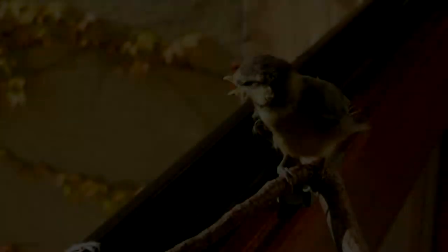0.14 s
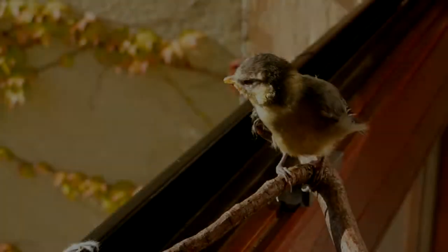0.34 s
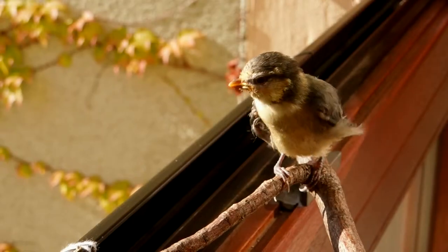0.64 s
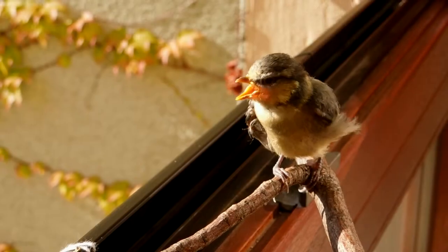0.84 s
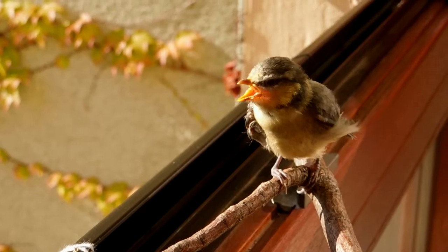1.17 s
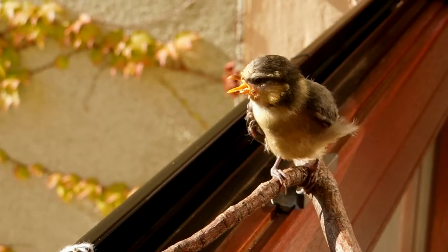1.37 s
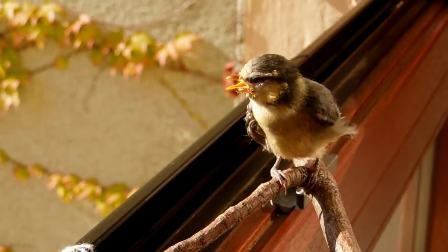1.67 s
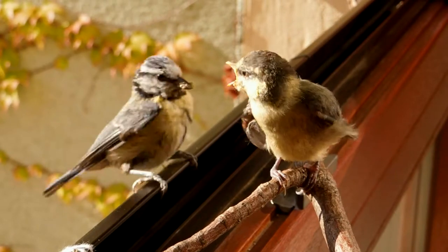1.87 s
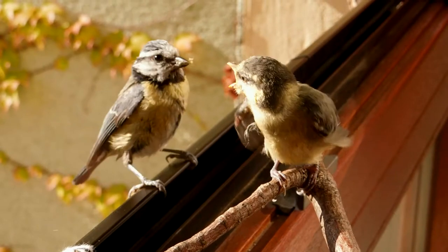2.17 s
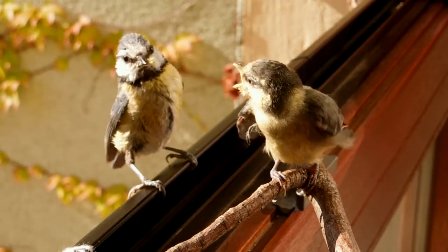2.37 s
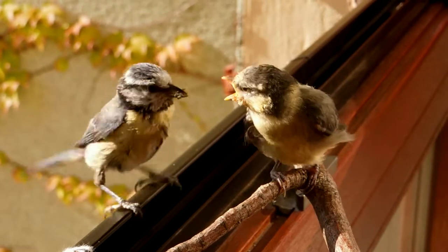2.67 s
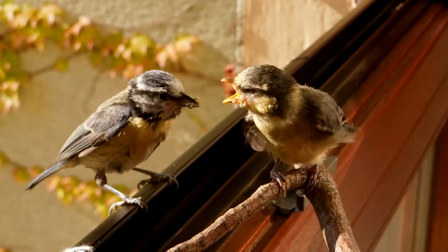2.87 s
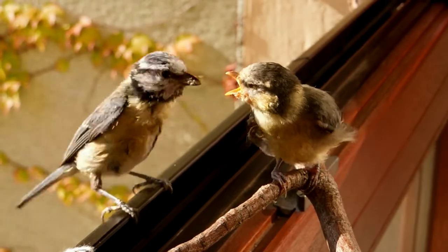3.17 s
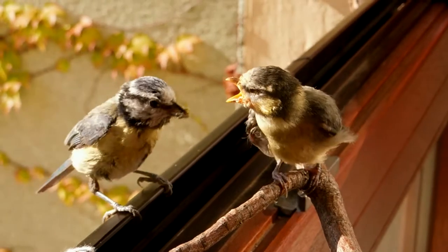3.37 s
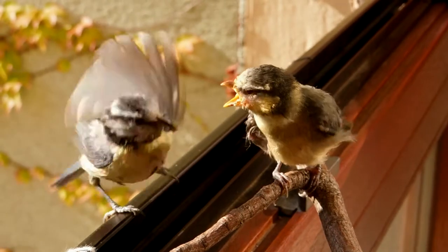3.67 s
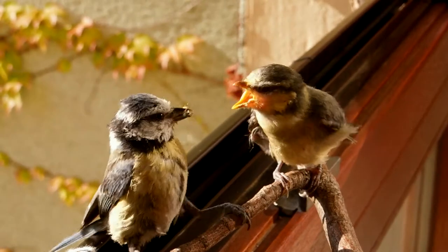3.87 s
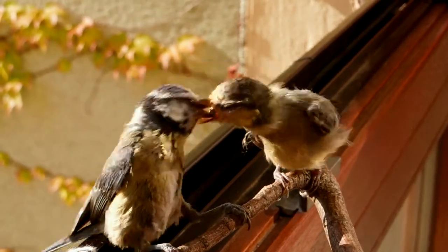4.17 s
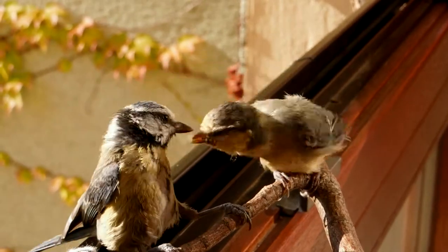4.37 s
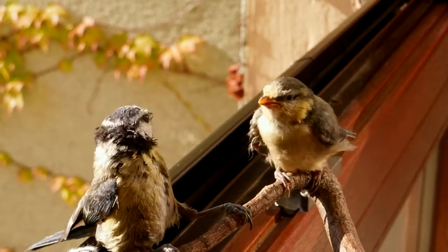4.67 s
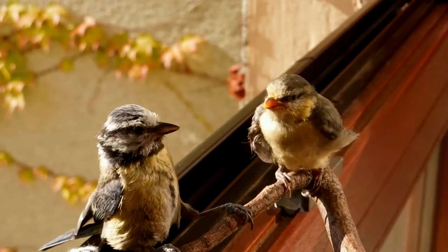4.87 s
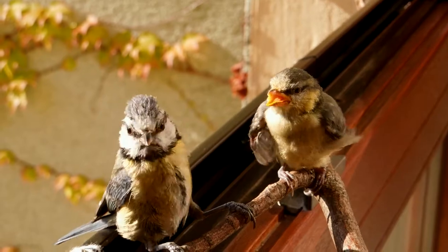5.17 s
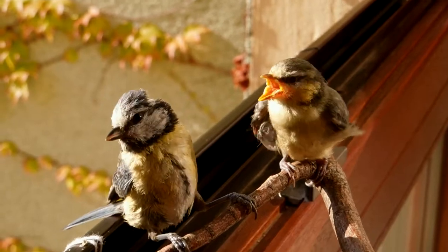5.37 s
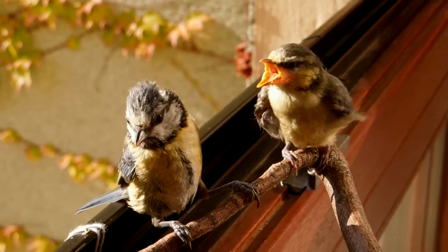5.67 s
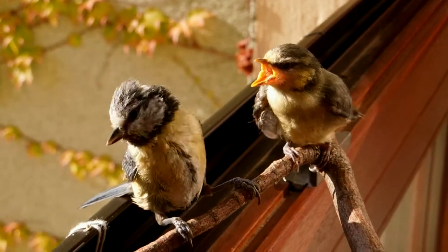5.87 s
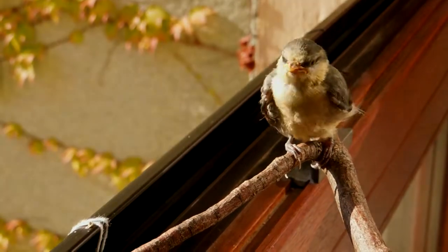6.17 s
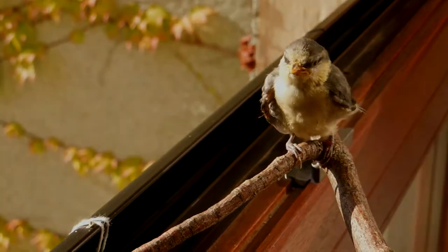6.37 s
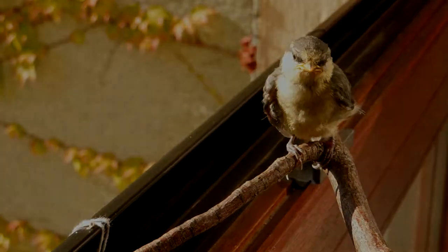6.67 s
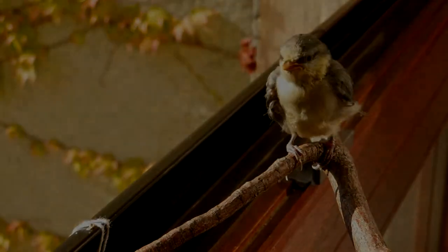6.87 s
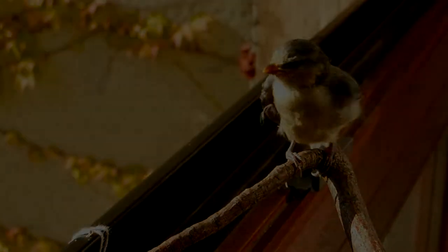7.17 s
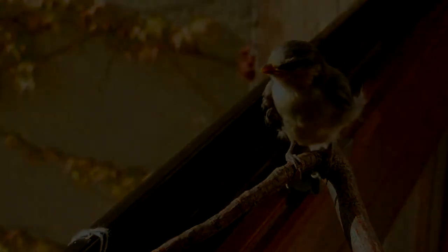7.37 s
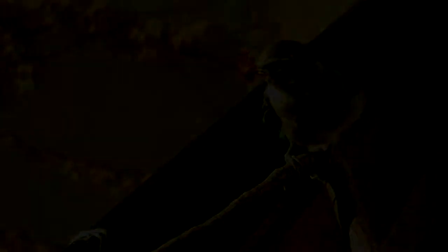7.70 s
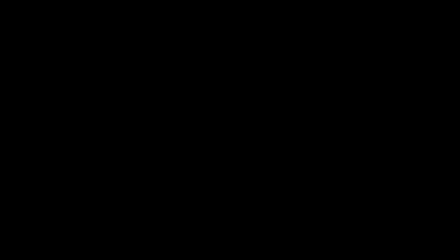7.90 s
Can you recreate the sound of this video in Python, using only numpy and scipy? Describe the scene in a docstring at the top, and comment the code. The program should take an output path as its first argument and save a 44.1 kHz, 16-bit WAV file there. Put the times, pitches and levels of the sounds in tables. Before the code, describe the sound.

Over a low, soft outdoor hush, a fledgling's very high begging calls burst out in short clusters, each scratchy at first and then piercing. Feathery wing flurries and small woody claw clicks mark the parent arriving and hopping. After feeding come tiny descending whistles, beak ticks and two crisp wing strokes, then a dwindling string of peeps and a sharp late tick. Close stereo microphones, short reflections from the wall, background fading in and out.

```python
"""A fledgling tit begs on a perch beside a house wall, a little louder in the right microphone.
Each call is a rasp of noise and ragged buzz; some lock into a squeal of two mixing tones, led in by a squeak.
Thin falling peeps are whistles with an octave. The parent flutters in, feeds it and leaves: pulsed and swept
noise for wings, a low throb for pushed air, short noise bursts for claws, beak and twig.
Behind them lie outdoor hush, rumble, a faint hum and a distant engine, fading in and out, and a late sizzle."""
import sys
import numpy as np
from scipy import signal
from scipy.fft import rfft, irfft, next_fast_len
from scipy.io import wavfile
from scipy.ndimage import map_coordinates

SR = 44100
rng = np.random.default_rng(int(sys.argv[2]) if len(sys.argv) > 2 else 0)


def inscribe(sig):
    """Save sig as 16-bit PCM at rate SR to the path in sys.argv[1].

    A 1-D sig is mono; a 2-D sig holds one channel per row.
    Samples are clipped to [-1, 1] before scaling.
    """
    pcm = np.round(np.clip(np.atleast_2d(sig).T, -1, 1) * 32767)
    wavfile.write(sys.argv[1], SR, pcm.astype(np.int16))


N = 354563

# Event levels are nominal: swells, fades, wall reflections and microphone balance act on them later.
# Spectra are relative: each noise is scaled to rms 1.

# Distant hush and rumble over time: start_s, rumble_db, hush_db
HUSH_LEVELS = [(1.0, -51.5, -47), (1.6, -54.5, -50), (2.1, -49, -45), (2.7, -52, -47), (4.3, -50.5, -43.5),
               (4.8, -53.5, -46), (6.3, -51.5, -46)]
# Spectrum of the hush: frequency_hz, density_db (per Hz)
AIR_SPECTRUM = [(60, -11.5), (105, -1.5), (150, -3.5), (195, -0.5), (240, -3), (310, -4.5), (440, -9.5),
                (620, -4.5), (1060, -5), (1600, -8), (2700, -16), (4200, -20.5), (9000, -26),
                (14000, -27.5)]
# Spectrum of the rumble: frequency_hz, density_db (per Hz)
RUMBLE_SPECTRUM = [(15, -8), (25, -4.5), (36, 8), (48, -4), (75, -1.5), (100, -16), (160, -46)]
# Distant engine, slowing under load, then picking up: time_s, pitch_hz, level_db
ENGINE_COURSE = [(1.5, 81.5, -59.5), (3.2, 74.37, -53.5), (4.2, 68, -50.5), (4.9, 65.5, -47.5),
                 (5.63, 60.12, -42.5), (5.82, 76.43, -61)]
# Faint far-off sizzle: time_s, level_db
SIZZLE_LEVELS = [(7.1, -86.5), (7.32, -60), (7.86, -67)]
# Spectrum of the sizzle: frequency_hz, level_db
SIZZLE_SPECTRUM = [(3600, -26.5), (4400, -3), (5500, -4.5), (6000, -29)]
# Overtones of the hum: multiple, level_db
HUM_OVERTONES = [(2, -1), (3, -2.5), (4, -4)]
# The hum briefly turns buzzy: start_s, end_s, overtones_db
HUM_BUZZY = (7.35, 7.5, -62)
# Dry ticks of beak and twig: start_s, level_db
TICKS = [(.3805, -35), (.385, -33.5), (5.1315, -27), (5.3377, -24), (6.0953, -28.5), (7.6133, -31),
         (7.6483, -12.5)]
# Spectrum of a tick: frequency_hz, level_db
TICK_SPECTRUM = [(300, -27.5), (850, 0.5), (1900, -8.5), (3100, -1), (5500, -2), (7500, -5), (10500, -2),
                 (13500, -6.5), (15000, -13)]
# Falling contact peeps: start_s, end_s, start_hz (before the opening hook), level_db
PEEPS = [(0.602, 0.654, 6740, -41.5), (5.131, 5.174, 6320, -26), (5.235, 5.297, 5990, -25.5),
         (5.802, 5.853, 6355, -25.5), (6.329, 6.375, 6120, -39.5), (6.428, 6.48, 6050, -38),
         (6.508, 6.558, 6350, -38.5), (6.594, 6.645, 6100, -41), (6.682, 6.744, 5740, -43.5),
         (6.793, 6.861, 5650, -45.5), (6.934, 6.998, 5490, -50), (7.069, 7.14, 5520, -51),
         (7.437, 7.516, 5750, -60)]
# Short squeaks as the beak opens: start_s, level_db
SQUEAKS = [(0.985, -34.5), (1.095, -32.5), (1.238, -28.5), (2.151, -33.5), (3.578, -36), (3.61, -39),
           (4.29, -26.5)]
# Begging calls that stay a rasp: start_s, end_s, level_db, treble_db, buzz_db
RASPS = [(1.411, 1.485, -40, -5, 4), (2.167, 2.241, -38, 0.5, -4.5), (2.697, 2.793, -29, -19.5, -5.5),
         (4.045, 4.096, -31, -2.5, -12)]
# Begging calls that lock from a rasp into a squeal: start_s, crest_s, end_s, rasp_db, squeal_db,
# crest_hz (upper voice), start_share (of crest_hz), lower_voice_db
SQUEALS = [(0.991, 1.032, 1.046, -38.5, -24.5, 8780, .83, 0.5),
           (1.1, 1.122, 1.177, -36, -17.5, 8770, 0.83, -1),
           (1.239, 1.263, 1.337, -40.5, -14.5, 8256, 0.99, -7.5),
           (2.312, 2.377, 2.386, -27, -13.5, 7800, .62, -11.5),
           (2.429, 2.464, 2.506, -32.5, -11.5, 8194, 0.75, -6),
           (2.555, 2.583, 2.638, -29.5, -11, 7850, .68, -13),
           (4.173, 4.23, 4.248, -27.5, -14, 8095, .62, -8.5),
           (4.294, 4.324, 4.356, -29.5, -11.5, 7830, 0.72, -7)]
# Spectrum of the rasp's hiss: frequency_hz, level_db
RASP_SPECTRUM = [(1500, -33), (2400, -21), (3100, -6.5), (3800, -10.5), (4800, 0.5), (6200, -7),
                 (7400, 5.5), (8300, -1.5), (9500, -13), (13500, -12), (15000, -17.5)]
# Spectrum of the rasp's added treble: frequency_hz, level_db
TREBLE_SPECTRUM = [(3000, -41), (7500, -32), (9500, -1), (13500, -5.5), (15000, -29.5)]
# Partials of the rasp's ragged buzz: multiple, level_db
BUZZ_PARTIALS = [(2, -9.5), (3, -7.5), (4, -7.5), (5, 1)]
# Tones made as the two voices mix in the syrinx: upper_multiple, lower_multiple, level_db
VOICE_BLENDS = [(-.5, 1, -36.5), (2, -1, -31.5), (-1, 2, -23), (1.5, 0, -32), (0, 2, -27), (1, 1, -15),
                (2, 0, -40.5), (-2, 3, -26.5), (-3, 4, -25.5), (3, -2, -28.5), (4, -3, -30)]
# Wing flurries: middle_s, level_db
WING_FLURRIES = [(1.39, -50), (1.881, -53.5), (1.969, -50), (2.09, -56.5), (2.99, -46), (3.24, -41),
                 (3.37, -53), (3.5, -43.5), (3.98, -50), (6.209, -44), (6.36, -49.5)]
# Spectrum of feathers brushing the air: frequency_hz, level_db
FEATHER_SPECTRUM = [(500, -18.5), (2200, 4), (4000, -3.5), (8000, -2.5), (12500, 6), (15000, -0.5)]
# Claws landing on the wooden frame: start_s, level_db
CLAWS = [(2.0467, -22.5), (2.9253, -32), (3.0165, -26.5), (3.0443, -31.5), (3.2536, -32.5), (3.5064, -33.5)]
# Spectrum of the wooden frame: frequency_hz, level_db
FRAME_SPECTRUM = [(300, -9.5), (900, -10), (1950, -3), (2280, 17.5), (2700, -4), (7000, -10), (13000, 0),
                  (15000, -9.5)]
# Air pushed at the microphones by the parent's wings: middle_s, half_width_s, level_db
DRAUGHTS = [(2.87, 0.14, -43.5), (6.275, .09, -42.5)]
# Hard wing strokes as the parent flies off: start_s, end_s, level_db
WING_STROKES = [(6.108, 6.152, -34), (6.243, 6.292, -24.5)]
# Spectrum of a wing stroke: frequency_hz, level_db
STROKE_SPECTRUM = [(710, -57.5), (1200, -28), (1410, -16), (1810, -21.5), (3910, -11.5), (4910, -6.5),
                   (8290, -13.5), (9570, 2), (14000, -11)]
# Opening and closing of the whole sound: time_s, gain
OPENING = [(.13, 0), (.15, 1), (7.862, 1), (7.872, 0)]

TOP_HZ = 14350  # nothing sounds from here up
FADE_IN_S, FADE_OUT_S, SILENT_AT_S = 2.13, 1.96, 8.14  # straight fades of the background
HUM_HZ, HUM_DB, HUM_OVERTONES_DB = 196, -60.5, -19
SECOND_HUM_HZ, SECOND_HUM_DB = 156.6, -63  # a lower tone beside it
PEEP_END_HZ, PEEP_BEND = 4694, 1.55  # every peep slides towards this pitch, ever more steeply
OCTAVE_DB = 1.5  # octave as a peep begins
SQUEAK_HZ = 7500  # strongest part of a squeak
RASP_SWELL_DB = 4.5  # tilt from start to end
LEAD_SWELL_DB, LEAD_TREBLE_DB, LEAD_BUZZ_DB = 7.5, -1, -15.5  # the rasp that leads into a squeal
VOICED_SHARE = .65  # last part of that rasp in which the voices already sound
LOWER_VOICE = .856  # pitch of the lower voice over the upper, before the sag
SAG_HZ, SAG_S, SAG_BEND = 672, .05, .8  # nominal fall this long after the crest, fastest at first
# a weak third voice: share of the upper pitch, how much faster it sags, level
UNDERTONE, UNDERTONE_SAG, UNDERTONE_DB = .52, 1.8, -28
FLURRY_S = 0.072  # width of a wing flurry between its 1/e points


def amp(db):
    """Decibels to gain."""
    return 10 ** (np.asarray(db) / 20)


def unit(x):
    """Scale to rms 1."""
    return x / np.sqrt(np.mean(x ** 2) + 1e-20)


def curves(rows):
    """One value per sample for each column after the time."""
    times, *columns = np.transpose(rows)
    return [np.interp(np.arange(N) / SR, times, column) for column in columns]


def wobble(rate, size):
    """A smooth random curve, rate knots a second."""
    knots = rng.standard_normal(int(size * rate / SR) + 4)
    return map_coordinates(knots, [np.arange(size) * rate / SR])


def filtered(x, response):
    """Multiply the spectrum of x by a response of frequency."""
    size = x.shape[-1]
    padded = next_fast_len(size + 8192)
    spectrum = rfft(x, padded) * response(np.fft.rfftfreq(padded, 1 / SR))
    return irfft(spectrum, padded)[..., :size]


def noise(colour, size):
    """Noise of rms 1 with a spectrum drawn through (Hz, dB) points on a log frequency axis."""
    points_hz, points_db = np.transpose(colour)

    def response(hz):
        return amp(np.interp(np.log(hz + 1), np.log(points_hz), points_db))

    return unit(filtered(rng.standard_normal(size), response))


def wide(colour, side_db):
    """Stereo noise: a part shared by both microphones and a weaker opposed part."""
    shared = noise(colour, N)
    opposed = noise(colour, N) * np.array([[1], [-1]])
    return unit(shared + amp(side_db) * opposed)


def gate(t, start, end, rise, fall):
    """Opens softly at start and closes at end."""
    opening = 1 + np.tanh((t - start) / rise)
    closing = 1 - np.tanh((t - end) / fall)
    return opening * closing / 4


def phase(hz):
    """Running phase of a pitch curve, in radians."""
    return 2 * np.pi * np.cumsum(hz) / SR


def add(track, s, sound):
    """Mix a sound into a track at time s."""
    part = track[max(round(s * SR), 0):][:len(sound)]
    part += sound[:len(part)]


def around(start, end):
    """Sample times of an event with a 40 ms margin on both sides."""
    return np.arange(start - .04, end + .04, 1 / SR)


def yard(x, early_db=-6, early_t60=0.077, late_db=-21, late_t60=0.13):
    """Wall and frame answer almost at once, the yard with a fainter tail, different at each microphone."""
    t = np.arange(SR // 2) / SR
    answer = np.zeros((2, len(t)))
    for db, t60, delay_s in [(early_db, early_t60, .0005), (late_db, late_t60, .008)]:
        tail = rng.standard_normal((2, len(t))) * amp(-60 * t / t60) * (t > delay_s)
        answer += amp(db) * tail / np.linalg.norm(tail, axis=1, keepdims=True)
    return x + signal.fftconvolve(x[None], answer, axes=1)[:, :N]


def fade():
    """Gain of the background: a straight rise, a hold and a straight fall towards silence."""
    t = np.arange(N) / SR
    return np.clip(np.minimum(t / FADE_IN_S, (SILENT_AT_S - t) / FADE_OUT_S), 0, 1)


def outdoors():
    """Distance: noise for hush, rumble and faint sizzle, a wavering sine for an engine changing speed."""
    rumble_db, hush_db = curves(HUSH_LEVELS)
    hush = amp(hush_db + 0.76 * wobble(12, N)) * wide(AIR_SPECTRUM, side_db=-7.5)
    rumble = amp(rumble_db + 1.2 * wobble(5, N)) * wide(RUMBLE_SPECTRUM, side_db=-11)
    engine_hz, engine_db = curves(ENGINE_COURSE)
    engine = amp(engine_db + wobble(14.0, N)) * unit(np.sin(phase(engine_hz)))
    sizzle = amp(curves(SIZZLE_LEVELS)[0]) * wide(SIZZLE_SPECTRUM, side_db=-1.5)
    return (fade() * (hush + rumble + engine) + sizzle) * amp([[-.5], [.5]])  # left, right dB


def hum():
    """A faint, wavering low hum far away: a tone with overtones, and a second tone below it."""
    start, end, buzzy_db = HUM_BUZZY
    turn = phase(HUM_HZ * (1 + .018 * wobble(8, N)))
    overtones = sum(amp(level) * np.sin(k * turn) for k, level in HUM_OVERTONES)
    steady = amp(HUM_DB) * fade() * (np.sin(turn) + amp(HUM_OVERTONES_DB) * overtones)
    buzzy = amp(buzzy_db) * gate(np.arange(N) / SR, start, end, .015, .015) * overtones
    second_turn = phase(SECOND_HUM_HZ * (1 + .018 * wobble(8, N)))
    second = amp(SECOND_HUM_DB + 2.0 * wobble(5.5, N)) * fade() * np.sin(second_turn)
    return amp(2.2 * wobble(7, N)) * (steady + buzzy) + second


def taps(rows, colour, t60, gain_db):
    """Brief contacts of beak, twig or claw: a burst of coloured noise with a fast decay."""
    out, t = np.zeros(N), np.arange(SR // 10) / SR
    for s, db in rows:
        add(out, s, amp(db + gain_db - 60 * t / t60) * noise(colour, len(t)))
    return out


def peeps(jitter=0.014, side_tone_db=-21, hook=0.065, closing_db=14.0, grow_db=9):
    """A thin whistle hooks up, then falls; its octave leads at first and gives way as the beak closes."""
    out = np.zeros(N)
    for start, end, start_hz, db in PEEPS:
        t = around(start, end)
        progress = np.clip((t - start) / (end - start), 0, 1.15)
        slide = start_hz + (PEEP_END_HZ - start_hz) * progress ** PEEP_BEND
        pitch = slide * (1 - hook * np.exp(-progress / 0.091))
        turn = phase(pitch * (1 + jitter * wobble(1200, len(t))))
        whistle = amp(grow_db * (progress - 1)) * np.sin(turn)
        # a weak tone between whistle and octave fades with the octave
        octave = np.sin(2 * turn) + amp(side_tone_db) * np.sin(1.35 * turn)
        bright = amp(OCTAVE_DB - closing_db * progress) * octave
        tone = (whistle + bright) * amp(1.9 * wobble(250, len(t)))
        add(out, t[0], amp(db) * tone * gate(t, start + 0.0056, end - .004, 0.0044, 0.0047))
    return out


def squeaks(t60=0.024):
    """A narrow, rough blip of the voice, made of band noise, that dies at once."""
    out, t = np.zeros(N), np.arange(SR // 10) / SR
    colour = [(SQUEAK_HZ * 0.68, -35), (SQUEAK_HZ * 0.81, -8), (SQUEAK_HZ, 0), (SQUEAK_HZ * 1.5, -25)]
    for s, db in SQUEAKS:
        attack = 1 - np.exp(-t / 0.0012)
        add(out, s, amp(db - 60 * t / t60) * attack * noise(colour, len(t)))
    return out


def rasps(buzz_hz=1470, arch_db=4, rise=.07):
    """The syrinx vibrates chaotically: a crackly hiss around a ragged buzz, swelling with the pressure."""
    out = np.zeros(N)
    plain = [(*row, RASP_SWELL_DB) for row in RASPS]
    leads = [(start, crest, db, LEAD_TREBLE_DB, LEAD_BUZZ_DB, LEAD_SWELL_DB)
             for start, crest, _, db, *_ in SQUEALS]
    for start, end, db, treble_db, buzz_db, swell_db in plain + leads:
        t = around(start, end)
        pressure = np.clip((t - start) / (end - start), 0, 1) - .5  # -0.5 at start, 0.5 at end
        ragged = 0.035 * wobble(1500, len(t)) + .025 * wobble(90, len(t))
        turn = phase(buzz_hz * (1 + rise * pressure + ragged))
        buzz = unit(sum(amp(level + 2.8 * wobble(500, len(t))) * np.sin(k * turn)
                        for k, level in BUZZ_PARTIALS))
        hiss = noise(RASP_SPECTRUM, len(t)) + amp(treble_db - 6) * noise(TREBLE_SPECTRUM, len(t))
        grain = unit(amp(2.4 * wobble(1100, len(t))))
        swell = amp(db + swell_db * pressure - arch_db * (2 * pressure) ** 2)
        level = swell * gate(t, start, end, .006, .007)
        add(out, t[0], (hiss + amp(buzz_db) * buzz) * grain * level)
    return out


def squeals(sweep=0.011, lower_fall=0.88, jitter=0.0045, stray=.0015, chaos=.07, lead_db=-13, fade_db=4):
    """Both sides of the syrinx start low and ragged, sweep up into clean tones, then sag together."""
    out = np.zeros(N)
    for start, crest, end, _, db, top_hz, start_share, low_db in SQUEALS:
        onset = crest - VOICED_SHARE * (crest - start)
        t = around(onset, end)
        locked = np.exp(-(np.minimum(t - crest, 0) / sweep) ** 2)  # 0 ragged, 1 clean
        spent = np.clip((t - crest) / max(end - crest, .01), 0, 1.2)
        sag = SAG_HZ / top_hz * (np.maximum(t - crest, 0) / SAG_S) ** SAG_BEND
        # the voices share one climb and one tremor; each also strays on its own, far less once locked
        climb = start_share + (1 - start_share) * locked
        pitch = top_hz * climb * (1 + jitter * wobble(1100, len(t)))
        rough = stray + chaos * (1 - locked) ** 2
        voices = [(1, 1), (LOWER_VOICE, lower_fall), (UNDERTONE, UNDERTONE_SAG)]  # pitch share, sag share
        upper, lower, under = [phase(share * pitch * (1 - fall * sag) * (1 + rough * wobble(1300, len(t))))
                               for share, fall in voices]
        tone = np.sin(upper) + amp(UNDERTONE_DB) * np.sin(under)
        tone += amp(low_db - 3.2 * (spent - .5)) * np.sin(lower)
        # coupling adds unsteady mixing tones; those fed by the lower voice follow its nominal strength
        for a, b, blend_db in VOICE_BLENDS:
            flicker = amp(3 * wobble(90, len(t)))
            blend = np.sin(a * upper + b * lower + 0.2 * wobble(700, len(t)))
            tone += amp(blend_db + abs(b) * low_db) * flicker * blend
        level = amp(db - 0.1 + lead_db * (1 - locked) - fade_db * spent + 1.2 * wobble(200, len(t)))
        add(out, t[0], tone * level * gate(t, onset, end, 0.0096, .004))
    return out


def wings():
    """Feathers brush the air in flurries: noise pulsing with the wing beats."""
    t = np.arange(N) / SR
    flurry = sum(amp(db) * np.exp(-(2 * (t - s) / FLURRY_S) ** 2) for s, db in WING_FLURRIES)
    beat_turn = phase(33 + 3 * wobble(4.3, N))  # about 33 beats a second
    beats = amp(2.7 * np.sin(beat_turn) + 2.6 * wobble(540, N))
    return flurry * unit(beats) * noise(FEATHER_SPECTRUM, N)


def draughts(beat_hz=35):
    """Wing beats close to the microphones throb the air at a very low pitch."""
    t = np.arange(N) / SR
    push = sum(amp(db) * np.exp(-((t - s) / half_width) ** 2) for s, half_width, db in DRAUGHTS)
    return push * np.sin(phase(beat_hz + 2 * wobble(13, N)))


def strokes(swell_db=6, arch_db=4):
    """Stiff flight feathers tear through the air: a bright, grainy swish that swells and stops."""
    out = np.zeros(N)
    for start, end, db in WING_STROKES:
        t = around(start, end)
        progress = np.clip((t - start) / (end - start), 0, 1) - .5  # -0.5 at start, 0.5 at end
        swell = amp(db + swell_db * progress - arch_db * (2 * progress) ** 2)
        level = swell * gate(t, start, end, .006, .007)
        grain = unit(amp(2.6 * wobble(1100, len(t))))
        add(out, t[0], level * grain * noise(STROKE_SPECTRUM, len(t)))
    return out


def scene():
    """Begging leans to the right microphone; peeps and the parent come more by way of the wall."""
    background = outdoors() + hum()
    tick_taps = taps(TICKS, TICK_SPECTRUM, t60=0.0074, gain_db=-9)
    ticks = yard(tick_taps, early_db=-3.0, early_t60=.014, late_db=-17.5)
    peeping = yard(peeps(), early_db=3.0, early_t60=0.049, late_db=-15.5, late_t60=0.27)
    # balance of the begging: left, right dB
    harsh = yard(rasps() + squeaks(), early_db=-1.0, late_db=-14.0) * amp([[-1.2], [-.4]])
    begging = yard(squeals(), early_db=-3, late_db=-17.0, late_t60=0.22) * amp([[-1.6], [1]])
    claws = taps(CLAWS, FRAME_SPECTRUM, t60=0.048, gain_db=-9)
    parent = yard(wings() + strokes() + claws, early_db=1.0, late_db=-13.5) + draughts()
    return background + ticks + peeping + harsh + begging + parent


def record(dry):
    """The whole sound switches on and off with short ramps, and nothing is kept above the band limit."""
    return filtered(dry * curves(OPENING)[0], lambda hz: hz < TOP_HZ)


dry = scene()
out = record(dry)
inscribe(out)
```